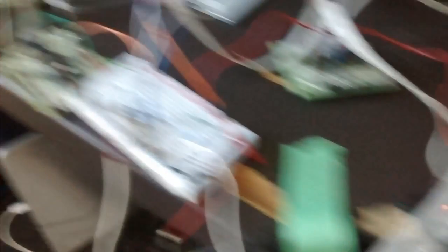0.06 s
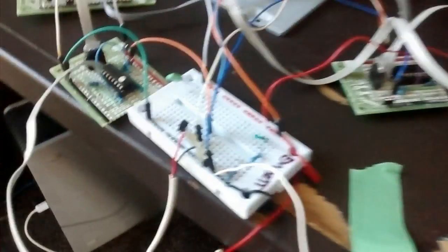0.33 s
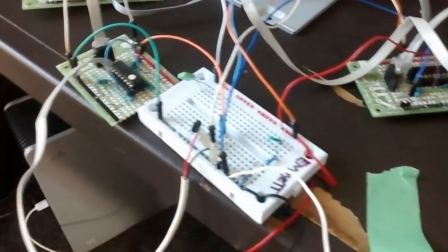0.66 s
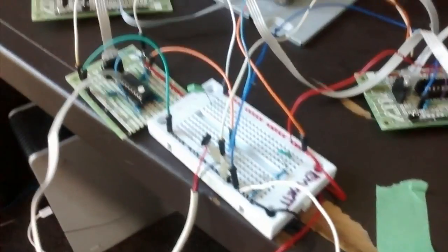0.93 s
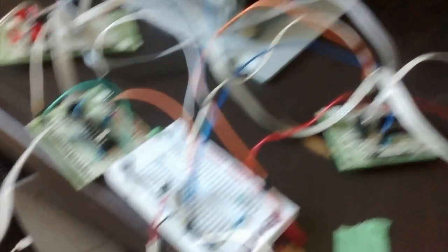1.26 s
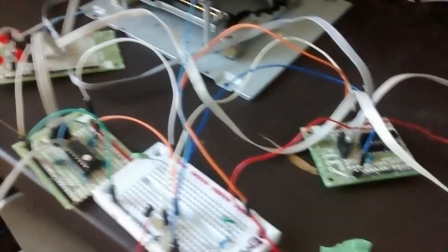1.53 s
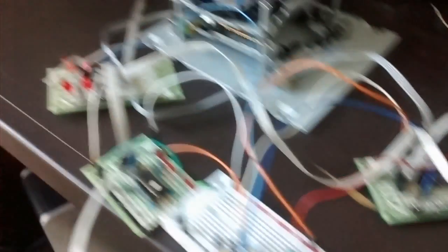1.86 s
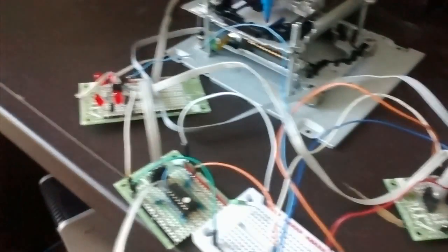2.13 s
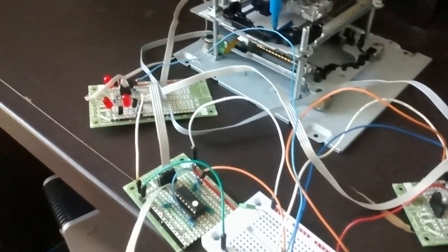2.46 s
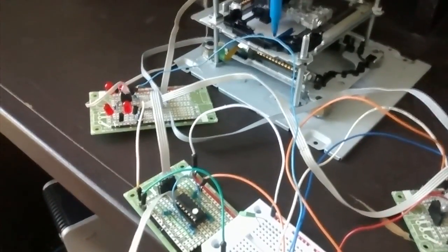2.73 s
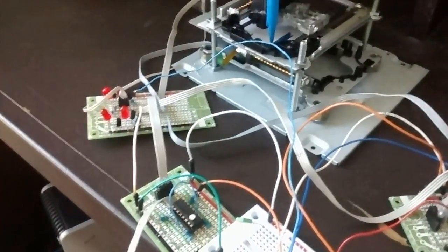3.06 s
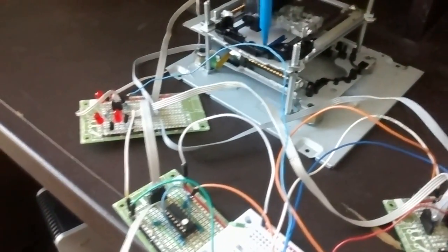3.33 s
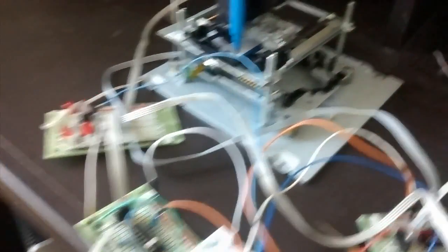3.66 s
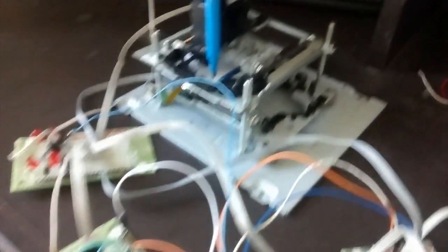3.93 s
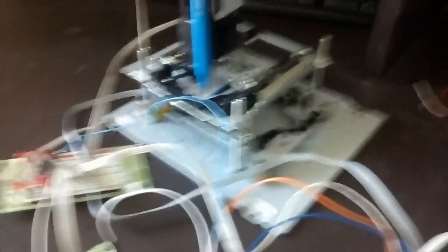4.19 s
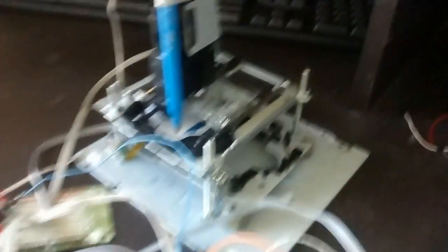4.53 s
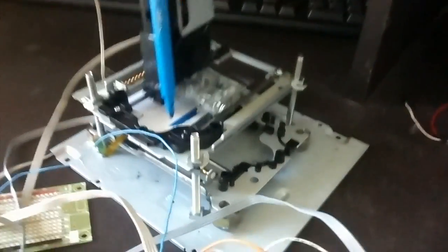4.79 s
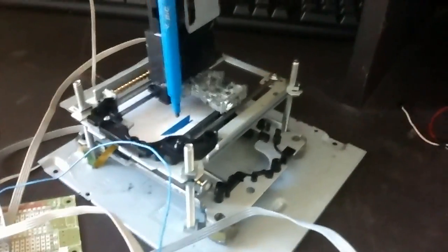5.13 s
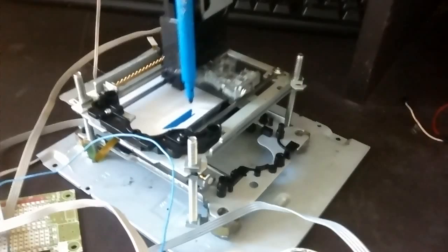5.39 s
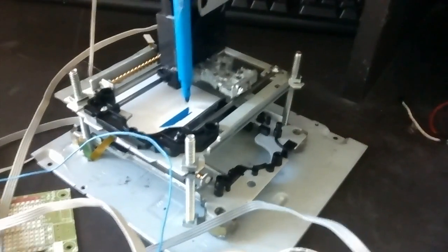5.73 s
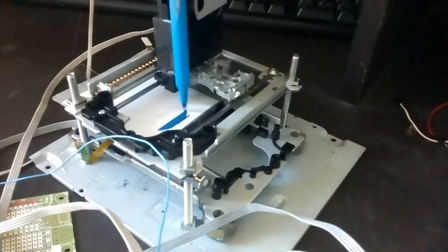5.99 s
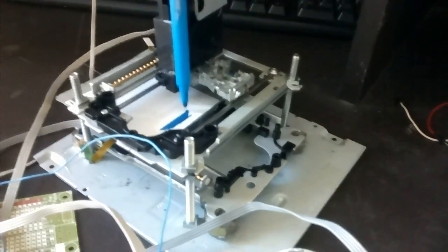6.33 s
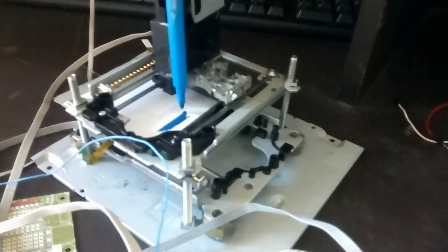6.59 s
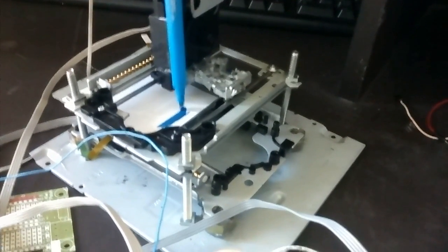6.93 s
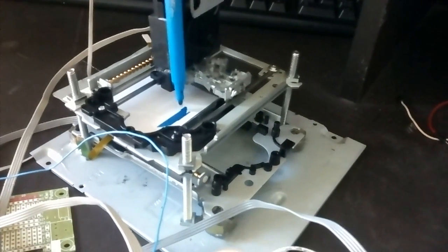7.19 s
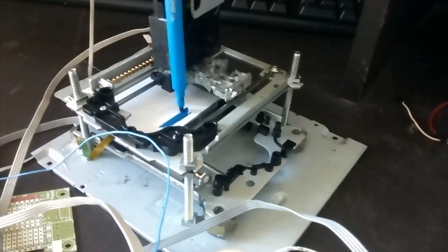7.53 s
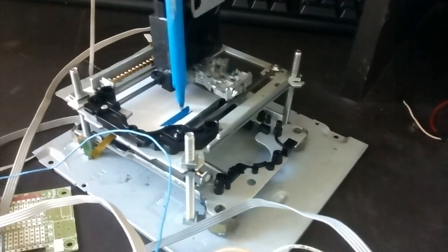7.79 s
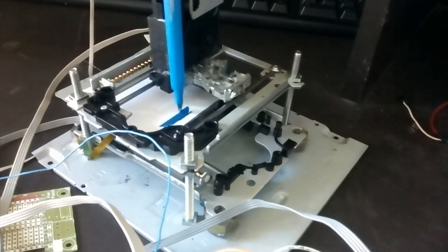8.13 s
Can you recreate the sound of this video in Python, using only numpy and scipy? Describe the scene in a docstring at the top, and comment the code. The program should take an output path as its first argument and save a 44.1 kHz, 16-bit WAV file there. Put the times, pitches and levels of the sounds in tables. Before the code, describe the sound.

Loose sliding parts tick and knock quickly against the metal frame of a small pen plotter, about five cycles a second. Its motor buzzes briefly and rests, then hums and whines for about a second, faltering before it finishes. The regular clicking returns, closer and with a faint desk rumble. A handheld stereo microphone picks it up in a quiet room.

```python
"""Quick, even clicking and clatter: a small pen plotter of optical-drive sleds hatches a drawing on a desk.
Stepper motors jerk the loose sleds through one short cycle; they squeak, strike the sheet-metal frame
and rock the base plate. A short buzzing traverse, a second of rest, a long traverse that limps near
its end; then the hatching goes on, nearer to the hand-held stereo microphone."""
import sys
import numpy as np
from scipy import signal
from scipy.fft import rfft, irfft, next_fast_len
from scipy.io import wavfile

SR = 44100
rng = np.random.default_rng(int(sys.argv[2]) if len(sys.argv) > 2 else 0)


def transcribe(signal):
    """Save signal, clipped to [-1, 1], as a 16-bit WAV file at the path in sys.argv[1]."""
    frames = np.atleast_2d(signal).T
    limited = np.clip(frames, -1, 1)
    pcm = np.round(limited * 32767).astype(np.int16)
    wavfile.write(sys.argv[1], SR, pcm)


N = 359415
TIME = np.arange(N) / SR
FFT_SIZE = next_fast_len(N + SR, real=True)
HZ = np.maximum(np.arange(FFT_SIZE // 2 + 1) * SR / FFT_SIZE, 1)
STEP_HZ = 247.9
CYCLE_S, RETURN_S = .2125, .093  # hatching period; start of the return stroke within it


def from_db(db):
    """Decibels to gain."""
    return 10 ** (np.asarray(db) / 20)


def unit_rms(x):
    """Scale to rms one."""
    return x / np.sqrt(np.mean(x ** 2) + 1e-20)


def at_hz(table, hz):
    """Interpolate a table along log frequency."""
    table = np.array(table)
    return np.interp(np.log(hz), np.log(table[:, 0]), table[:, 1])


def drift(rate_hz):
    """Random wander between Gaussian knots."""
    knots = rng.standard_normal(N // 32)
    return np.interp(TIME * rate_hz, np.arange(len(knots)), knots)


def causal(gain):
    """Minimum-phase response of unit power: rings only after the strike."""
    cepstrum = irfft(np.log(unit_rms(gain) + 1e-7), FFT_SIZE)
    cepstrum[1:FFT_SIZE // 2] *= 2
    cepstrum[FFT_SIZE // 2 + 1:] = 0
    return np.exp(rfft(cepstrum))


def through(x, response):
    """Filter by a frequency response."""
    return irfft(rfft(x, FFT_SIZE) * response, FFT_SIZE)[..., :N]


def partial(turns, waver):
    """Sine of wavering strength, rms about one."""
    return np.sqrt(2) * np.sin(2 * np.pi * (turns + rng.random())) * (1 + waver * drift(28))


def diffuse(gain):
    """Stereo noise whose left-right likeness varies with frequency."""
    # freq_hz, correlation
    likeness = [(40, 0.49), (130, 0), (400, 0), (1000, 0.87), (2500, 0), (15000, 0.067)]
    alike = at_hz(likeness, HZ)
    mid, side = through(rng.standard_normal((2, N)), gain * np.sqrt([1 + alike, 1 - alike]))
    return unit_rms(np.array([mid + side, mid - side]))


def background(air_db=-51, hum_trim_db=-1):
    """Quiet room noise with a faint hum."""
    # freq_hz, relative_db
    air_spectrum = [(12, -45), (20, 3), (43, -1.5), (84, -6), (103, -30), (121, 3), (151, -22.5), (205, -7),
                    (450, -15), (750, -19), (1500, -24), (2400, -29), (3900, -26), (4800, -31.5),
                    (7000, -29), (9900, -32.5), (11100, -34), (15000, -68)]
    hum_lines = [(119, -63.5), (570.6, -71)]
    air = from_db(air_db) * diffuse(from_db(at_hz(air_spectrum, HZ)))
    return air + sum(from_db(db + hum_trim_db) * partial(hz * TIME, waver=0.88) for hz, db in hum_lines)


def desk_rumble(start_s=5.5, rise_s=0.034, level_db=-52.5):
    """The shaken desk rumbles, heard only from near."""
    # freq_hz, relative_db
    spectrum = [(15, -20), (30, 8), (60, 7.5), (100, 5.5), (200, -52)]
    shaken = 1 - np.exp(-np.maximum(TIME - start_s, 0) / rise_s)
    return from_db(level_db) * shaken * diffuse(from_db(at_hz(spectrum, HZ)))


def room(x, desk_db=-10, desk_t60_s=0.042, desk_low_hz=700, wall_db=-14, wall_t60_s=0.16, wall_hz=8000):
    """Quick desk scatter, shifting as the hand moves the microphone, then a duller tail from the walls."""
    desk_noise = through(rng.standard_normal((2, N)), 1 / np.hypot(1, (desk_low_hz / HZ) ** 2))
    scatter = unit_rms(desk_noise * from_db(-60 * TIME / desk_t60_s))
    wall_noise = diffuse(1 / np.hypot(1, HZ / wall_hz))
    tail = unit_rms(wall_noise * from_db(-60 * TIME / wall_t60_s) * (1 - np.exp(-TIME / 0.0025)))
    here, there, *walls = through(x, rfft(np.vstack([scatter, tail]), FFT_SIZE)) / np.sqrt(N)
    sway_rad = 2 * drift(3)
    shifting = here * np.cos(sway_rad) + there * np.sin(sway_rad)
    reflections = from_db(desk_db) * shifting + from_db(wall_db) * np.array(walls)
    return (x + reflections) / np.hypot(1, from_db(desk_db))


def ports(clatter, tones):
    """The left microphone port faces the plotter; the right is later, duller and partly diffuse."""
    # freq_hz, left_minus_right_db
    balance = [(150, 0), (250, -2), (340, 18.5), (480, 6), (700, 3), (1000, 2.5), (1650, -5), (2100, 4),
               (2900, -4.5), (3500, 0), (4300, -0.5), (6000, 9.5), (8000, 16), (12000, 12.5), (14000, 55)]
    # freq_hz, right_lag_rad
    lag = [(150, 0), (215, -.1), (250, -.8), (330, -.3), (600, -.3), (780, .1), (1450, .1), (1850, 2.9),
           (2600, 3.2), (3150, 4.9), (3500, 5.9), (3900, 6.7), (4700, 9.4), (5800, 12.5), (6600, 14.5)]
    # freq_hz, diffuse_power_share
    right_scatter = [(240, 0.016), (400, 0.76), (700, 0.51), (1050, 0.16), (1350, 0.42), (1700, 0.37),
                     (2300, 0.2), (3150, 0.081), (3500, 0.044), (4300, 0.14), (5800, 0.74), (7000, 0.99)]
    ratio, share = from_db(at_hz(balance, HZ)), at_hz(right_scatter, HZ)
    right_gain = np.sqrt(2 / (1 + ratio ** 2))
    late = right_gain * np.exp(-1j * at_hz(lag, HZ))
    left = through(clatter[0] + tones, right_gain * ratio)
    direct = through(clatter[1], late * np.sqrt(1 - share)) + through(tones, late)
    scattered = through(clatter[1], 1j * late * np.sqrt(share)) * np.sqrt(2) * np.sin(2 * drift(90))
    return np.array([left, direct + scattered])


def pan(x):
    """The plotter moves from slightly right to about centre as the microphone nears."""
    # time_s, left_minus_right_db
    path = [(0, -1), (3.5, -1.1), (5, 0), (5.8, -0.2)]
    pan_db = np.interp(TIME, *np.transpose(path))
    return x * from_db([pan_db / 2, -pan_db / 2])


def microphone_turn(x, turn_s=2.12, span_s=0.48, treble_hz=5000, mid_hz=3500, mid_width_hz=1700):
    """The microphone swings toward the plotter: the treble drops, the upper mids come forward."""
    treble = through(x, 1 - 1 / (1 + (HZ / treble_hz) ** 8))
    mids = through(x, np.exp(-(2 * (HZ - mid_hz) / mid_width_hz) ** 2))
    turned = (1 + np.tanh((TIME - turn_s) / span_s)) / 2
    treble_db = np.interp(turned, [0, 1], [2.5, -1.2])
    mid_db = np.interp(turned, [0, 1], [-2.2, 0.8])
    return x + (from_db(treble_db) - 1) * treble + (from_db(mid_db) - 1) * mids


def resonance_db():
    """Spectral lift from the modes of frame and plate."""
    # centre_hz, width_hz, lift_db
    modes = [(147.6, 20, 28.5), (222.3, 44, 15.5), (281, 15.4, 11), (429.5, 31, 5.5), (502, 53, 9.5),
             (725, 67, 6.5), (1011, 91, 8), (1177, 21, 7), (1346, 30, 6), (1436, 18, 6.5), (2300, 186, 7),
             (2630, 66, 5), (2900, 170, 4.5), (3075, 33, 6.5), (3470, 296, 8.5), (3820, 147, 7),
             (4435, 710, 9), (5260, 143, 0), (6740, 93, 6), (7560, 930, 7.5), (8140, 630, 3),
             (10180, 170, 7.5), (11970, 1460, 9.5)]
    return sum(db / (1 + (2 * (HZ - hz) / width_hz) ** 2) for hz, width_hz, db in modes)


def chatter(per_s, spread_db, alike=0):
    """Dense tiny impacts of uneven size; the power share `alike` repeats every hatching cycle."""
    sizes = from_db(spread_db * np.clip(rng.standard_normal(N), -2, 2)) * rng.choice([-1, 1], N)
    fresh = unit_rms(sizes * (rng.random(N) < per_s / SR))
    looped = unit_rms(np.resize(fresh[N // 2:N // 2 + round(CYCLE_S * SR)], N))
    return np.sqrt(1 - alike) * fresh + np.sqrt(alike) * looped


def step_gate(turns, sharpness):
    """Parts rattle hardest as the rotor snaps to its next step; mean power one."""
    return np.exp(sharpness * np.cos(2 * np.pi * turns)) / np.sqrt(np.i0(2 * sharpness))


def bursts(contacts, rise_s=0.0011):
    """Tick, knock and snap envelopes: each contact pulses at the step rate and dies away."""
    power = np.zeros((3, N))
    for start_s, *levels_db, t60_s in contacts:
        span = slice(max(int(start_s * SR) + 1, 0), int(start_s * SR) + SR // 5)
        age_s = np.maximum(TIME[span] - start_s, 0)
        shape = (1 - np.exp(-age_s / rise_s)) * from_db(-60 * age_s / t60_s)
        shape *= step_gate((age_s - rise_s) * STEP_HZ, sharpness=0.18)
        power[:, span] += np.outer(from_db(levels_db), shape) ** 2
    return np.sqrt(power)


def frame(envelopes, spectrum, low_cut_hz, alike=0, crossover_hz=1903, snap_hz=5460, snap_octaves=0.28):
    """Impacts ring the frame: hard ones tick brightly, heavy ones knock, small parts snap drily."""
    gain = from_db(at_hz(spectrum, HZ) + resonance_db())
    dull = 1 / (1 + (HZ / crossover_hz) ** 8)
    low_cut = 1 / (1 + (low_cut_hz / HZ) ** 8)
    snap_band = 1 / (1 + (np.log2(HZ / snap_hz) / snap_octaves) ** 4)
    ticks = envelopes[0] * chatter(per_s=9000, spread_db=1.5, alike=alike)
    knocks = envelopes[1] * chatter(per_s=6000, spread_db=2.5, alike=alike)
    snaps = envelopes[2] * chatter(per_s=7000, spread_db=4.5)
    return (through(ticks, causal(gain * np.sqrt(1 - dull)))
            + through(knocks, causal(gain * np.sqrt(dull * low_cut)))
            + through(snaps, causal(np.sqrt(snap_band))))


def thread_jump(start_s=5.3283, level_db=-5.5, cut_hz=6500):
    """One hard click as the sled jumps on its thread."""
    click = from_db(level_db) * (np.arange(N) == int(start_s * SR))
    return through(click, causal(from_db(resonance_db() / 2) / np.hypot(1, (HZ / cut_hz) ** 3)))


def screw_gain(hz, lift_db=9, rest_db=-5, half_width_octaves=0.44):
    """The screw's resonance moves with the sled and lifts whatever lies near it."""
    # time_s, resonance_hz
    track = [(4.66, 940), (4.84, 970), (5.158, 1180), (5.194, 1240), (5.24, 1010), (5.286, 1100),
             (5.33, 740), (5.5, 845)]
    distance = np.log2(hz / np.interp(TIME, *np.transpose(track))) / half_width_octaves
    return from_db(rest_db + lift_db / (1 + distance ** 2))


def swells(turns):
    """Single overtones swell as the sled passes places where the frame takes them up."""
    # peak_s, half_width_s, step_multiple, level_db
    peaks = [(4.79, 0.099, 3, -42), (4.9, 0.19, 4, -39), (5.1, 0.29, 5, -42), (5.16, 0.086, 22, -43),
             (5.22, .07, 14, -35), (5.26, 0.11, 7, -45.5), (5.28, 0.16, 23, -47.5), (5.37, 0.12, 4, -46),
             (5.39, 0.15, 2, -43.5), (5.4, .11, 12, -36.5), (5.41, 0.19, 3, -47), (5.43, .07, 14, -35),
             (5.72, 0.055, 2, -40.5)]
    return sum(from_db(db) * np.exp(-((TIME - peak_s) / width_s) ** 2) * partial(k * turns, waver=0.18)
               for peak_s, width_s, k, db in peaks)


def traverse_envelopes(stop_s=0.015):
    """A short traverse, then a long one in four legs; each builds up, changes steadily and rings out."""
    # start_s, end_s, rattle_db, knock_db, hum_db, whine_db, growl_db
    legs = [(3.411, 3.551, -31, -33.5, -32, -35.5, -69), (4.61, 5.307, -29.5, -33, -33, -36.5, -47.5),
            (5.304, 5.48, -28, -38.5, -36, -32, -68), (5.479, 5.708, -31, -37.5, -44.5, -39, -37),
            (5.687, 5.755, -28, -36, -31.5, -35.5, -44)]
    # rattle, knock, hum, whine, growl
    slopes_db_per_s = (-2, -7, 0.5, -0.5, -32)
    rises_s = (0.019, 0.012, 0.05, 0.045, 0.01)
    envelopes = np.zeros((5, N))
    for start_s, end_s, *levels_db in legs:
        age_s = np.clip(TIME - start_s, 0, end_s - start_s)
        release = np.exp(-np.clip(TIME - end_s, 0, 1) / stop_s)
        for envelope, db, slope, rise_s in zip(envelopes, levels_db, slopes_db_per_s, rises_s):
            envelope += (1 - np.exp(-age_s / rise_s)) * from_db(db + slope * age_s) * release
    return envelopes


def stepper(rattle_trim_db=-2, knock_trim_db=-5, knock_hz=870, jitter_turns=0.0074):
    """The traversing motor hums, whines and rattles; limping, it growls on quarters of the step rate."""
    # step_multiple, relative_db
    overtones = [(2, -14.5), (3, -15), (4, -16.5), (5, -19.5), (6, -17.5), (7, -10.5), (9, -18), (11, -8),
                 (12, -17), (14, -5.5), (15, -9.5), (17, -29)]
    # freq_hz, relative_db
    growl_spectrum = [(60, -22), (125, 0.5), (185, 0), (320, -40), (435, 1.5), (560, 1), (680, -14),
                      (807, 5.5), (930, 2.5), (1120, -12), (1430, -33), (1900, 4)]
    rattle_spectrum = [(60, 7), (130, -10), (330, -7.5), (600, -6), (1100, -5.5), (1850, -4), (2800, 2),
                       (3700, -7), (4800, -8.5), (6000, -7), (7800, -13), (9500, -9.5), (11200, -26),
                       (13000, -16), (15000, -47)]
    # sled catching on its screw: start_s, tick_db, knock_db, snap_db, t60_s
    catches = [(3.419, -38, -35, -44, 0.036), (5.693, -20, -45, -53, 0.11), (5.709, -22, -43, -45, 0.032)]
    rattling, knocking, humming, whining, limping = traverse_envelopes()
    turns = STEP_HZ * TIME + jitter_turns * drift(90)
    whine = sum(from_db(db) * screw_gain(k * STEP_HZ) * partial(k * turns, waver=0.49)
                for k, db in overtones)
    growl = sum(from_db(at_hz(growl_spectrum, k * STEP_HZ)) * partial(k * turns, waver=0.34)
                for k in np.arange(2, 24) / 4 if k != 1)
    hum = partial(turns, waver=0.11)
    tones = humming * hum + whining * whine + limping * unit_rms(growl) + swells(turns)
    ticks = from_db(rattle_trim_db) * rattling
    knocks = from_db(knock_trim_db) * knocking * screw_gain(knock_hz)
    steps = np.array([ticks, knocks, np.zeros(N)]) * step_gate(turns, sharpness=0.2)
    return tones, frame(np.hypot(steps, bursts(catches)), rattle_spectrum, low_cut_hz=223)


def hatch_cycles(start_s, count, out_db, back_db, out_db_per_s, uneven_db):
    """Even cycles whose outward stroke slowly changes level; rows of start_s, out_db, back_db."""
    age_s = CYCLE_S * np.arange(count)
    out_error_db, back_error_db = uneven_db * rng.standard_normal((count, 2)).T
    outward_db = out_db + out_db_per_s * age_s + out_error_db
    return np.transpose([start_s + age_s, outward_db, back_db + back_error_db])


def each_cycle(cycles, events):
    """Every event in every cycle; rows of start_s, stroke_db, the event's other columns."""
    return [(start_s + offset_s, out_db if offset_s < RETURN_S else back_db, *rest)
            for start_s, out_db, back_db in cycles for offset_s, *rest in events]


def bell(start_s, length_s):
    """Sample span, age and sine-squared window of a short event."""
    span = slice(max(int(start_s * SR), 0), int((start_s + length_s) * SR))
    age_s = TIME[span] - start_s
    return span, age_s, np.sin(np.pi * age_s / length_s) ** 2


def squeaks(cycles, glides, uneven_db=2.2, grain_hz=2000):
    """Short, hoarse squeaks as a sled slides and brakes; no two alike."""
    out = np.zeros(N)
    grain = unit_rms(drift(grain_hz)) + 1j * unit_rms(drift(grain_hz))
    for start_s, stroke_db, length_s, start_hz, end_hz, level_db in each_cycle(cycles, glides):
        span, age_s, window = bell(start_s, length_s)
        turns = (start_hz + (end_hz - start_hz) * age_s / length_s / 2) * age_s
        gain = from_db(level_db + stroke_db + uneven_db * rng.standard_normal())
        out[span] += gain * window * np.real(grain[span] * np.exp(2j * np.pi * turns))
    return out


def sled_slides(far_cycles, near_cycles, far_db=2, far_db_per_s=1.5):
    """Both runs of squeaks; the far ones grow as the microphone moves."""
    # offset_s, length_s, start_hz, end_hz, level_db
    far_glides = [(.01, 0.037, 7780, 7480, -52)]
    near_glides = [(.018, 0.0227, 8050, 7650, -38.5), (.118, 0.029, 7850, 7920, -43.5)]
    far = from_db(far_db + far_db_per_s * TIME) * squeaks(far_cycles, far_glides)
    return far + squeaks(near_cycles, near_glides)


def base_plate(far_cycles, near_cycles, uneven_db=0.5):
    """Each jerk rocks the base plate for a few periods."""
    # offset_s, length_s, pitch_hz, level_db
    far_swings = [(-.008, 0.089, 143.5, -51.5), (.001, 0.041, 243, -35), (0.026, 0.048, 223, -40.5),
                  (.05, 0.052, 213, -48), (.112, 0.039, 152, -43), (.11, 0.069, 213, -52.5),
                  (.135, .065, 142, -52.5)]
    near_swings = [(0, 0.032, 282.6, -39.5), (.003, 0.044, 145, -40), (.015, 0.069, 213.7, -46.5),
                   (.038, 0.049, 142, -45), (.112, 0.027, 236, -35.5), (.135, 0.075, 222, -48.5)]
    swings = each_cycle(far_cycles, far_swings) + each_cycle(near_cycles, near_swings)
    out = np.zeros(N)
    for start_s, stroke_db, length_s, pitch_hz, level_db in swings:
        span, age_s, window = bell(start_s, length_s)
        gain = from_db(level_db + stroke_db / 2 + uneven_db * rng.standard_normal())
        out[span] += gain * window * np.sin(2 * np.pi * pitch_hz * age_s)
    return np.sqrt(2) * out


def sled_clatter(cycles, contacts, spectrum, low_cut_hz, uneven_db=0.5, jitter_s=0.00072):
    """Loose sleds strike the frame cycle after cycle, never quite alike."""
    strikes = []
    for start_s, stroke_db, tick_db, knock_db, snap_db, t60_s in each_cycle(cycles, contacts):
        late_s, error_db = rng.standard_normal(2) * [jitter_s, uneven_db]
        levels_db = stroke_db + np.array([tick_db + error_db, knock_db, snap_db + error_db])
        strikes.append((start_s + late_s, *levels_db, t60_s))
    return frame(bursts(strikes), spectrum, low_cut_hz, alike=.65)


def far_hatching(cycles, gain_db=3.0):
    """Sled clatter from afar, while the microphone turns."""
    # offset_s, tick_db, knock_db, snap_db, t60_s
    contacts = [(-.008, -43, -30.5, -45, 0.019), (-.0035, -25, -26, -30, 0.0053),
                (.002, -35.5, -31, -42, 0.071), (0.017, -51.5, -41, -55.5, 0.24),
                (0.104, -46, -43.5, -49, 0.03), (.111, -38, -41, -40.5, 0.021),
                (0.12, -58, -42, -55.5, 0.18), (0.147, -39, -46, -44.5, 0.022),
                (0.18, -45.5, -41.5, -47.5, 0.042)]
    # freq_hz, relative_db
    spectrum = [(60, -33), (130, -0.5), (330, -6.5), (520, -7.5), (600, -10), (850, -13), (1100, -13),
                (1380, -8.5), (1600, -13), (1850, -9.5), (2800, 1), (3700, 0.5), (4800, -2), (7800, -10),
                (9500, -2.5), (11200, -13), (13000, -16.5), (15000, -59)]
    return from_db(gain_db) * microphone_turn(sled_clatter(cycles, contacts, spectrum, low_cut_hz=266))


def near_hatching(cycles, gain_db=0.91, ping_hz=3480, ping_width_hz=120, ping_db=7):
    """Sled clatter from close by, where one narrow mode of the frame rings out."""
    # offset_s, tick_db, knock_db, snap_db, t60_s
    contacts = [(-.003, -32, -36, -44, 0.086), (.0035, -23.5, -34.5, -40.5, 0.04),
                (.011, -31.5, -32.5, -59, 0.11), (0.0408, -28, -31, -59, 0.033),
                (0.073, -31.5, -32.5, -42.5, 0.043), (0.093, -34.5, -35, -76, .05),
                (.1, -29, -31, -68, 0.12), (0.123, -38, -35.5, -49.5, 0.17)]
    # freq_hz, relative_db
    spectrum = [(60, -11), (130, 0.5), (330, -4), (600, -9), (1100, -15), (1850, -8.5), (2800, -0.5),
                (3700, -9.5), (4800, -11.5), (7800, -14.5), (9500, -13), (11200, -28), (13000, -19.5),
                (15000, -44)]
    ping = 1 + (from_db(ping_db) - 1) / (1 + 2j * (HZ - ping_hz) / ping_width_hz)
    return from_db(gain_db) * through(sled_clatter(cycles, contacts, spectrum, low_cut_hz=291), ping)


def scene():
    """Far hatching, two traverses and near hatching, heard through two unlike ports."""
    # first cycles after the long traverse: late_s, out_change_db, back_change_db
    unsettled = [(-.0075, -1, 0.5), (.002, -5.5, 0.5), (-.0015, 0, 0)]
    far = hatch_cycles(.0222, count=16, out_db=-2.0, back_db=1.8, out_db_per_s=0.38, uneven_db=0.38)
    near = hatch_cycles(5.8422, count=11, out_db=0.5, back_db=-1.7, out_db_per_s=-0.6, uneven_db=1.1)
    near[:len(unsettled)] += unsettled
    hatching = far_hatching(far) + near_hatching(near) + sled_slides(far, near)
    rocking = base_plate(far, near)
    tones, rattle = stepper()
    clatter = room(hatching + rattle + thread_jump()) + rocking
    return pan(ports(clatter, tones)) + desk_rumble() + background()


def record(dry):
    """Steep low-pass at 15.2 kHz."""
    return signal.sosfilt(signal.ellip(10, .2, 90, 15200, fs=SR, output="sos"), dry)


dry = scene()
out = record(dry)
transcribe(out)
```